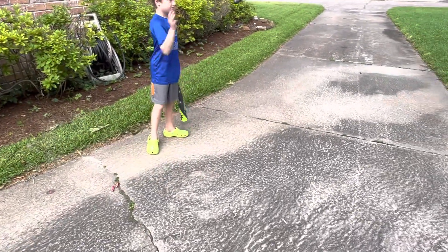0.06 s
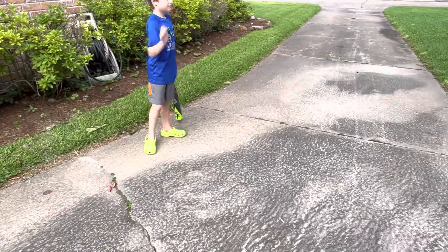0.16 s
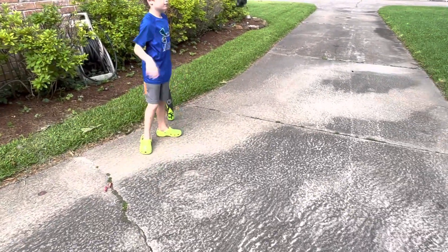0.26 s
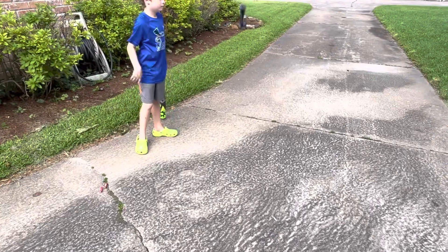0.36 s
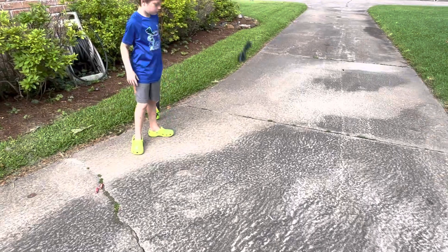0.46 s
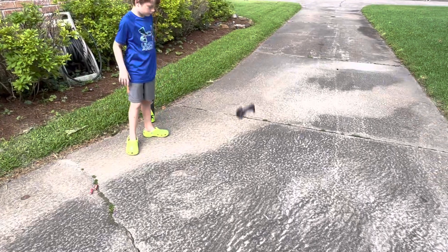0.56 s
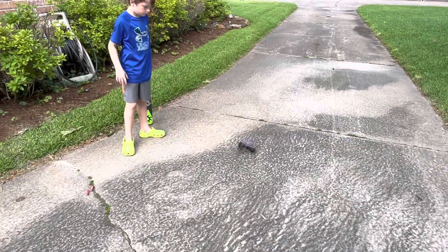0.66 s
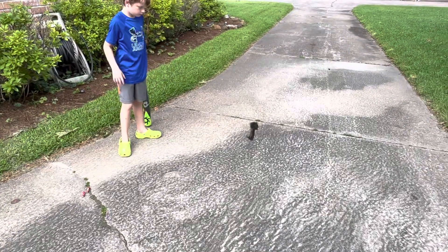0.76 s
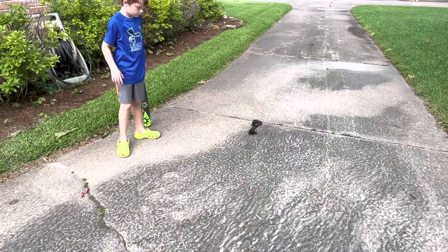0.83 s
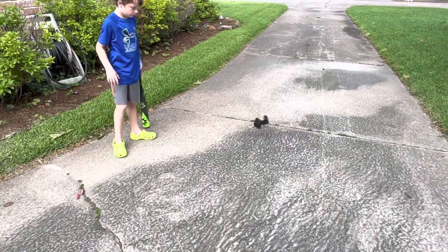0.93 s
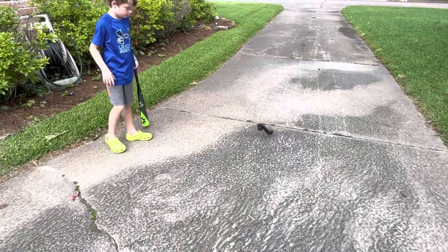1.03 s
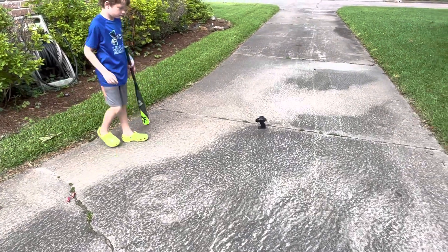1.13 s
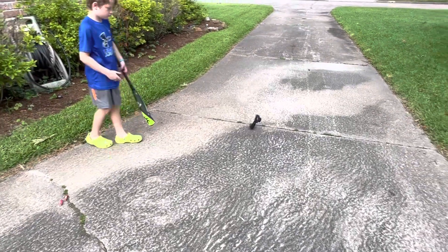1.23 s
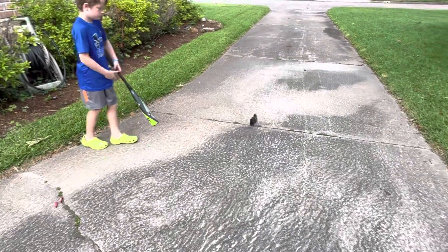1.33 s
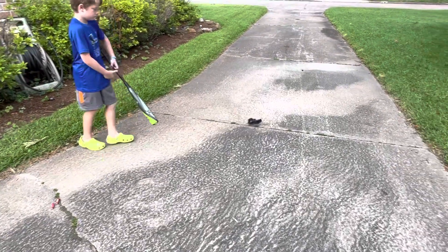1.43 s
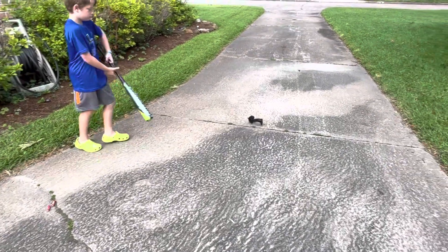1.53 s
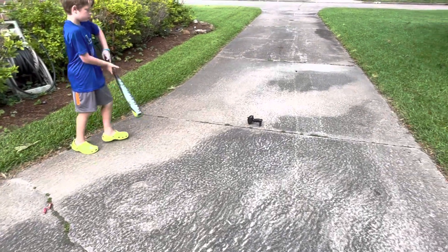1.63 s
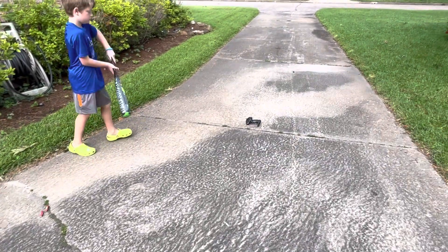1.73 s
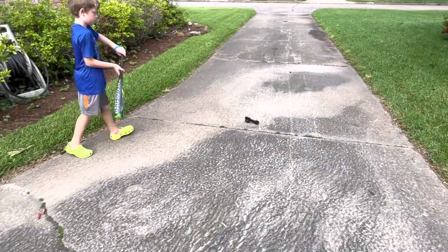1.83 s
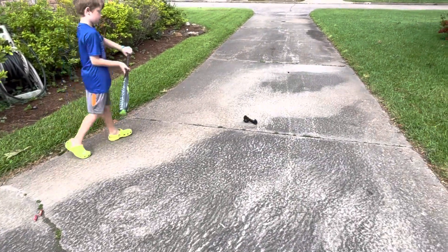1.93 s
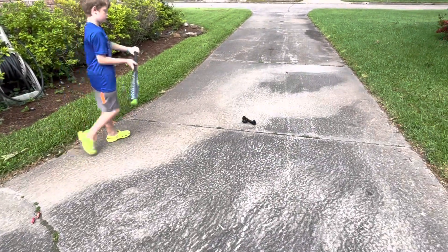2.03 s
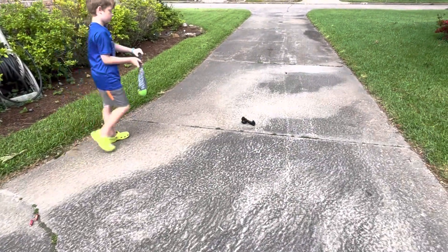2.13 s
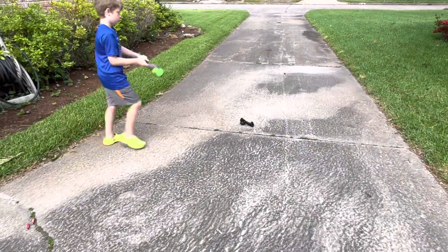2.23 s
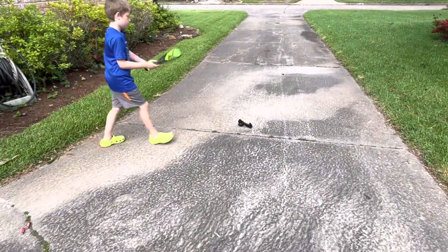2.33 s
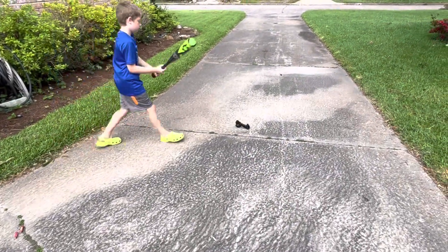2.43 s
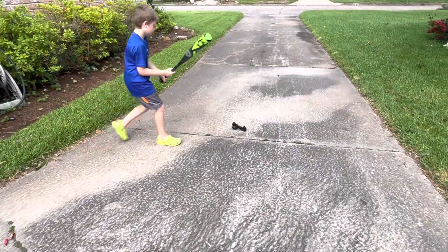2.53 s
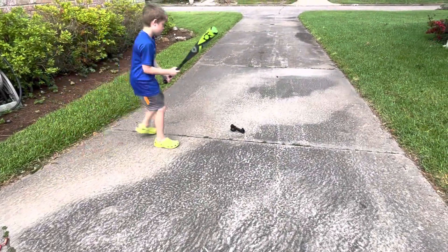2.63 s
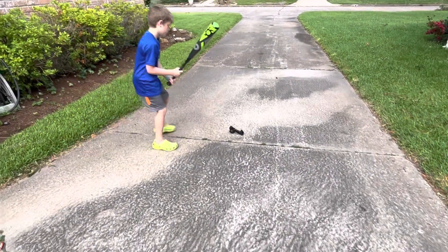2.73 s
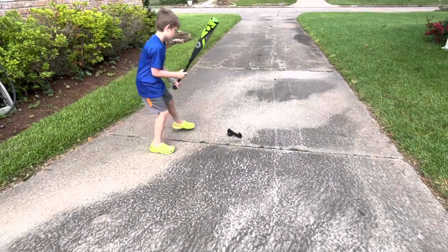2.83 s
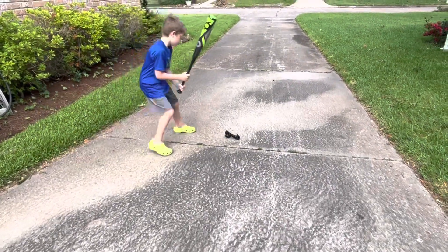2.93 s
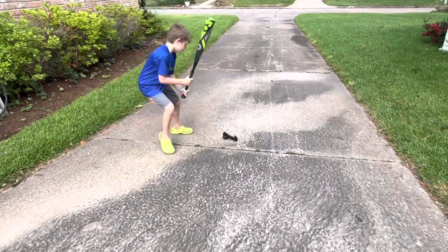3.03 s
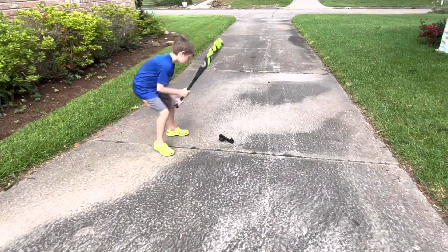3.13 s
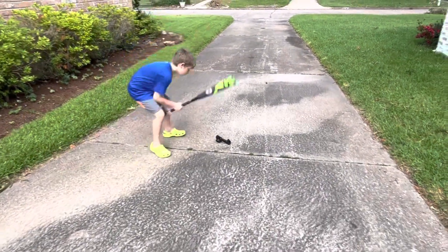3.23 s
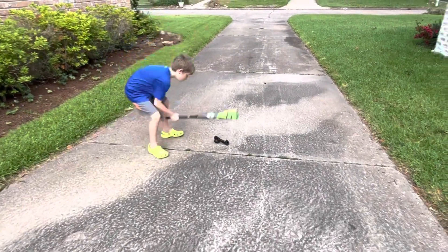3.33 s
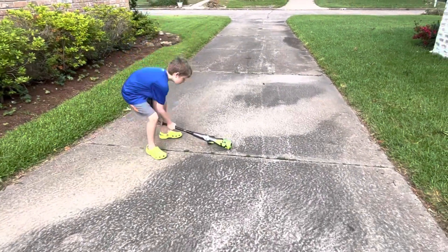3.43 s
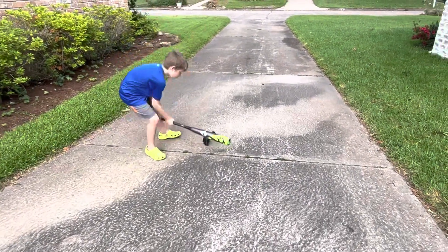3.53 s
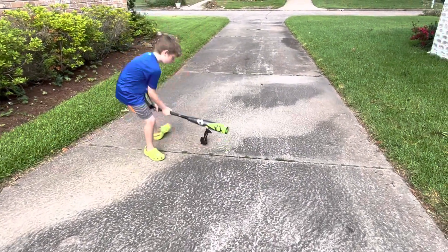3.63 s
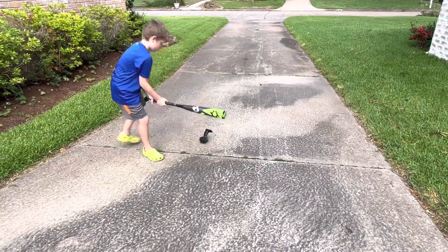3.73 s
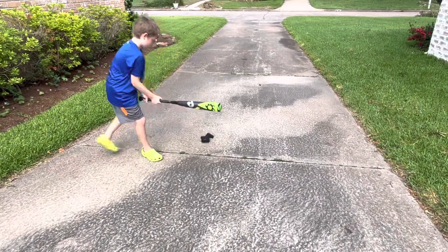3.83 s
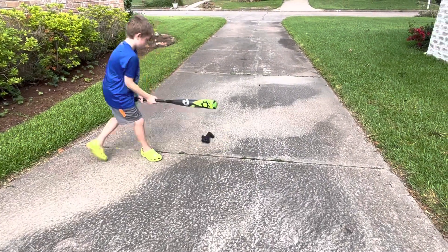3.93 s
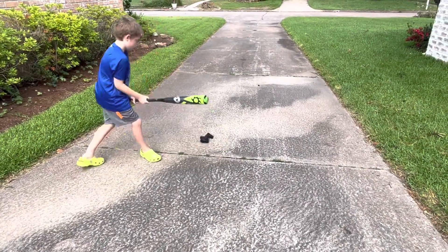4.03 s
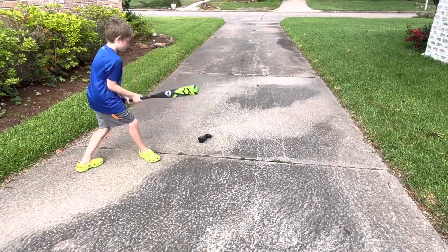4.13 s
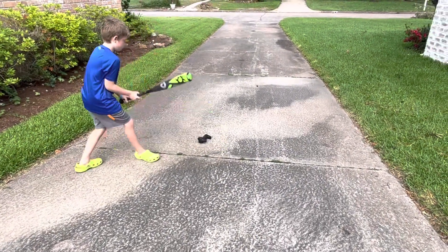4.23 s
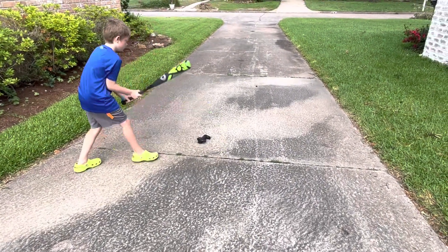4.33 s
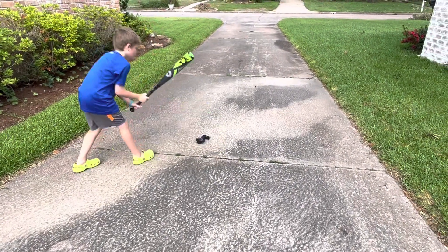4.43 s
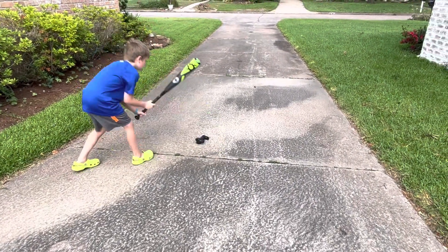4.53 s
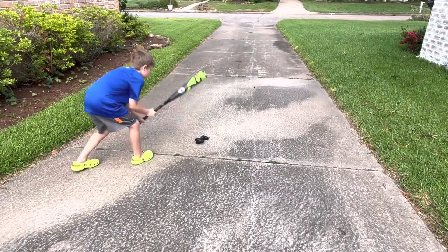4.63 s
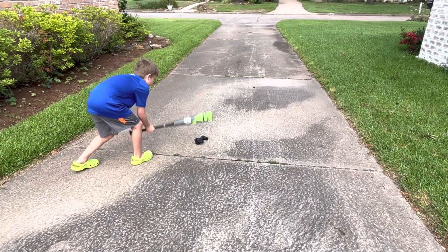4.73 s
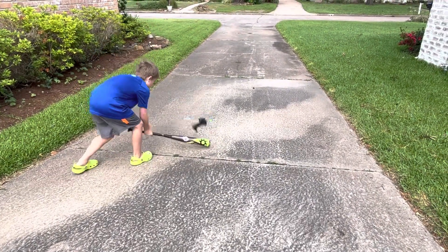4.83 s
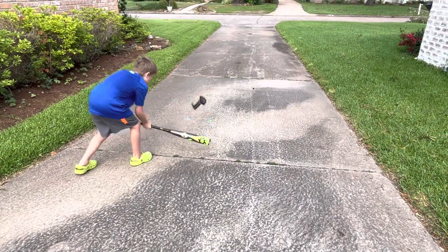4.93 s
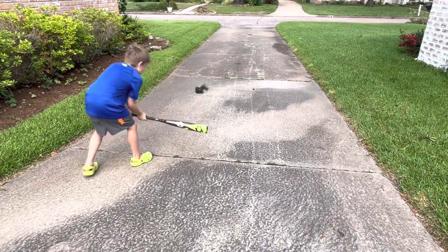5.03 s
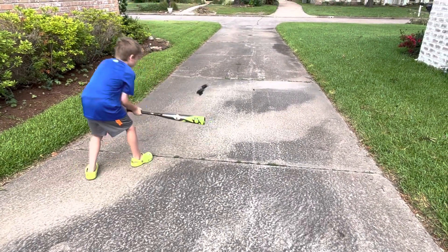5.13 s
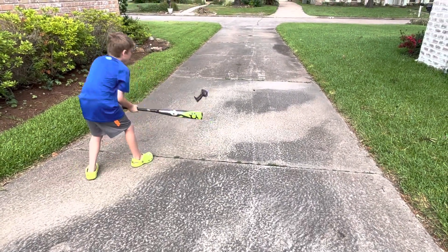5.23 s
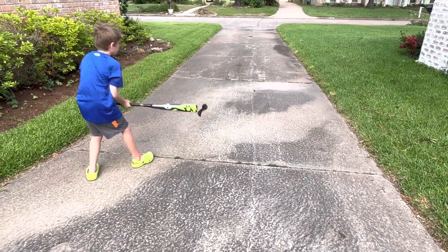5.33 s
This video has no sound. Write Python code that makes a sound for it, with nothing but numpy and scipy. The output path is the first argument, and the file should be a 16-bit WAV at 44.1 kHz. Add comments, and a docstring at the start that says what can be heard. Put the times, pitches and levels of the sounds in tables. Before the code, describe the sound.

On an outdoor driveway, a small hollow plastic object lands with a sharp clack, bounces and tumbles to rest. Shoes scuff softly on grit. A metal bat then smacks it with a hard crack and hollow ring, and the piece clatters down; more scuffing, then a second ringing crack. Faint birds, low rumble and short wall echoes; close handheld stereo microphone.

```python
"""Over low rumble, soft hiss (both coloured noise) and faint birds (gliding tones), a hollow plastic object
lands on a concrete driveway and tumbles to rest: noise bursts with short ringing modes.
Steps then scuff and grind grit (banded noise, bright ticks). Twice a metal bat swishes and cracks into the
plastic, ringing in four decaying modes; the object clatters down after the first blow and knocks after the second.
House walls and yard answer with single echoes, a patchy noise tail and thin late slaps."""
import sys
import numpy as np
from scipy import signal
from scipy.fft import rfft, irfft
from scipy.io import wavfile
from scipy.ndimage import uniform_filter1d

SR = 44100
rng = np.random.default_rng(int(sys.argv[2]) if len(sys.argv) > 2 else 0)


def dump(signal):
    """Clip the signal to [-1, 1] and save it as 16-bit WAV at the path in sys.argv[1]."""
    limited = np.clip(np.atleast_2d(signal).T, -1, 1)
    pcm = np.round(limited * 32767).astype(np.int16)
    wavfile.write(sys.argv[1], SR, pcm)


N = 236684
HZ = np.fft.rfftfreq(N, 1 / SR)

# distant low rumble: f/Hz, relative density/dB per Hz
RUMBLE = [(20, -33.5), (35, -23), (58, -2), (95, -3.5), (140, -4.5), (200, -16.5), (400, -42),
          (1000, -79.5)]
# loudness of the rumble before its dips: t/s, level/dB
RUMBLE_LEVEL = [(0, -45), (1.5, -42.5), (3.2, -42.5), (4.2, -43.5), (4.6, -46.5), (5.37, -42)]
# soft neighbourhood hiss: f/Hz, relative density/dB per Hz
AIR = [(20, -30.5), (100, -6.5), (180, -2), (300, -5), (520, -10.5), (880, -5.5), (1700, -19.5),
       (2800, -30), (4200, -42), (6200, -41.5), (8000, -56), (15000, -58)]
# likeness of rumble and hiss in the two channels: f/Hz, correlation/-1 to 1
AIR_SAME = [(60, 0.97), (180, 0.93), (400, 0.55), (750, .15), (1500, 0), (8000, 0.061)]
AIR_DB = -46  # rms of the hiss before its dips

# a distant bird's long whistles: start t/s, length/s, start f/Hz, end f/Hz, level/dB
WHISTLES = [(0.537, 0.36, 2980, 2830, -55), (2.379, 0.56, 2918, 2596, -58.5),
            (3.953, 0.34, 3000, 2710, -57)]
# a small bird's chips: start t/s, length/s, start f/Hz, end f/Hz, level/dB
CHIPS = [(.058, .02, 5900, 6200, -68), (.145, .016, 5000, 5120, -71), (.175, .022, 6200, 5000, -68),
         (.376, .02, 6550, 6150, -66), (.463, .02, 6350, 5900, -68)]

# single echoes off ground and walls, before the yard colour: delay/s, level/dB
WALLS = [(0.0115, -7.5), (.0345, -15.5), (.0445, -19.5), (0.093, -22)]
# colour of all the echoes: f/Hz, level/dB
YARD = [(200, -3.5), (700, 1.5), (2000, -1), (5000, 3.5), (8000, -3), (14000, -10)]
# decay of the long tail: f/Hz, t60/s
YARD_DECAY = [(300, 0.38), (800, 0.85), (2000, 1), (5000, 1), (9000, 0.9), (14000, 0.82)]
# thin late slaps off a far house front: loudest t/s, spread (Gaussian sigma)/s, level/dB, centre f/Hz, width/octaves
SLAPS = [(.918, 0.0029, -32, 4820, 0.09), (3.63, 0.014, -40.5, 4800, 0.13),
         (5.009, 0.0061, -40, 4700, 0.11)]

# soles scuffing and stamping, plastic sliding: loudest t/s, spread/s, level/dB, centre f/Hz, width/octaves
SCUFFS = [(1.92, .008, -49, 1960, 0.69), (2.392, 0.14, -67.5, 4900, 0.89), (2.92, 0.062, -60.5, 2400, 1.35),
          (3.231, 0.0016, -35.5, 1300, .44), (3.244, 0.013, -41.5, 1210, 0.78),
          (3.2513, 0.0005, -22.5, 1130, 0.56), (3.625, 0.019, -44, 900, 0.53),
          (3.68, 0.11, -46.5, 2560, 0.96), (3.9, 0.016, -41, 1000, 0.47), (4.124, .006, -45, 1450, 0.74)]
# barrel meeting the concrete on the second blow: loudest t/s, spread/s, level/dB, centre f/Hz, width/octaves
THUDS = [(4.792, .0072, -31.5, 300, .7)]
# swish of each swing: loudest t/s, spread/s, level/dB, centre f/Hz, width/octaves
SWISHES = [(3.218, .07, -67.5, 6500, 0.93), (4.65, 0.052, -58, 4400, 0.52)]
# grit under shoes and small taps: t/s, relative level/dB
TICKS = [(1.8242, -30.5), (2.025, -42.5), (2.1343, -42), (2.3438, -37), (2.384, -38), (2.807, -48),
         (2.9393, -29.5), (3.0664, -40), (4.2322, -29), (4.337, -39)]

# blows of the bat: t/s, ring level/dB, tilt of the modes/dB per octave, time to the barrel's quiet side/s,
# change of the ring by then/dB, depth of the background dip/dB, time to the bottom of that dip/s
BLOWS = [(3.387, -13, -3, .19, -1, 12, 0.1), (4.775, -12.5, -7, .245, -5.5, 5, 0.37)]
# modes of the metal barrel: f/Hz, relative level/dB, t60/s
BARREL = [(955, -18, 0.04), (1741, -4.5, 0.89), (2490, 2.5, 0.2), (4310, -2.5, .22)]
# pings of the barrel skipping after a blow: t/s, level/dB, f/Hz, decay time constant/s
PINGS = [(3.443, -26, 4410, 0.0045), (4.822, -17, 4420, 0.0041)]
# turning speeds up as this power of time; depth/dB of the dip on the quiet side; power that narrows the dip
TURN_POWER, QUIET_SIDE_DB, DIP_NARROWNESS = 1.9, -17, 29

# knocks on the plastic: t/s, relative level/dB, hardness/dB, rattle length/s, side that is struck
KNOCKS = [(0.6808, -25.5, 5.5, 0.0058, "flat"), (0.693, -19.5, -2, 0.015, "end"),
          (1.0524, -23.5, -1, 0.0063, "rim"), (1.28, -26, -3.5, 0.0067, "flat"),
          (1.415, -32.5, -1.5, 0.0073, "flat"), (1.488, -27.5, -3, 0.0062, "flat"),
          (1.602, -30, -20, 0.0092, "end"), (1.7341, -38, -0.5, 0.011, "flat"),
          (1.7698, -31.5, -9, 0.033, "end"), (3.3848, -22.5, 2.5, .008, "crushed"),
          (3.397, -22, 0.5, 0.011, "split"), (3.406, -28.5, 8, 0.0089, "pinned"),
          (3.8488, -26.5, -2.5, 0.0084, "split"), (4.0755, -43, -8.5, 0.017, "end"),
          (4.111, -42.5, -11, 0.0088, "end"), (4.7754, -21.5, 3.5, 0.0045, "pinned"),
          (4.779, -23, 3.5, 0.0027, "crushed"), (4.792, -29, 4, 0.0064, "end")]
# ways to strike the plastic, by name: low f/Hz, middle f/Hz, high f/Hz, hollow body level/dB
SIDES = {"flat": (674.5, 1231.5, 3260, -1), "end": (1201, 1480.5, 3596, -16),
         "rim": (618.5, 2348, 3700, -4.5), "pinned": (891.5, 1326, 3466, -6.5),
         "crushed": (935.5, 2793.5, 3399, -9), "split": (810, 1702.5, 3890, -7.5)}
# ringing of those three notes ahead of the band balance: relative level/dB, t60/s
NOTES = [(-7, .026), (-9, .016), (-11, .012)]
# shell modes, detuned at every knock: nominal f/Hz, relative level/dB, t60/s
SHELL = [(693, -12, 0.027), (850, 3.5, 0.013), (915, 0.5, 0.011), (1154, 0.5, 0.016), (1493, 5.5, 0.025),
         (2108, 0, 0.022), (2433, 1, 0.034), (2744, -4.5, 0.038), (3355, -13.5, 0.0088),
         (4095, -11.5, 0.034), (5436, 0.5, 0.018), (6920, -1.5, 0.02)]
# edges of the body, clack, crack and snap bands: f/Hz
KNOCK_BANDS = [400, 1000, 2800, 6500, 15000]
# likeness of knocks, ticks and swells in the two channels, clipped to -1 to 1 in use: f/Hz, correlation
KNOCK_SAME = [(400, 0.5), (750, 1.2), (5000, -0.2), (7000, -0.25), (12000, -0.08)]
# crack and snap against the clack at zero hardness/dB; growth of the snap per dB of hardness
CRACK_DB, SNAP_DB, SNAP_GROWTH = -0.5, -6, 1.31
# contact rise time constant/s; random spread of the notes/share; lead of the notes on the left/s
CONTACT_S, NOTE_SPREAD, PORT_LAG = 0.00036, .02, .00004
LEAD = 64  # samples of room ahead of each knock

# stereo balance of direct knocks, ticks, scuffs, thuds and swishes: f/Hz, left minus right level/dB
BALANCE = [(200, 0), (600, 4), (1200, 7), (2200, -0.5), (4000, -8.5), (6000, -0.5), (12000, -1)]
# treble colour of the whole sound: f/Hz, level/dB
TREBLE = [(4000, 0), (6500, .5), (8200, 0.5), (10300, -3), (12800, 4), (14300, -4.5), (15800, -3)]
EDGE_HZ = 15300  # top of the band


def amp(db):
    """Decibels to gain."""
    return 10 ** (np.asarray(db) / 20)


def unit(x):
    """Scales to an average energy of one per channel."""
    return x / np.sqrt(np.mean(np.sum(x ** 2, -1)) + 1e-20)


def read(points, hz):
    """Reads a curve on a log-frequency axis."""
    f, value = np.transpose(points)
    return np.interp(np.log(hz + 1), np.log(f + 1), value)


def tint(x, curve):
    """Colours a sound with a curve in dB."""
    size = x.shape[-1]
    return irfft(rfft(x) * amp(read(curve, np.fft.rfftfreq(size, 1 / SR))), size)


def add(mix, s, sound):
    """Adds a sound into the stereo mix at time s."""
    part = mix[:, max(round(s * SR), 0):][:, :sound.shape[-1]]
    part += sound[..., :part.shape[-1]]


def level(curve):
    """Gain at every sample from rows of t/s, level/dB."""
    return amp(np.interp(np.arange(N) / SR, *np.transpose(curve)))


def noise_pair(likeness, size):
    """White noise for two channels, correlated by a share that depends on frequency."""
    same = np.clip(read(likeness, np.fft.rfftfreq(size, 1 / SR)), -1, 1)
    a, b = rfft(rng.standard_normal((2, size)))
    return irfft([a, same * a + np.sqrt(1 - same ** 2) * b], size)


def wash(spectrum):
    """Steady noise of a given colour, at an rms of one."""
    return unit(tint(noise_pair(AIR_SAME, N), spectrum)) * np.sqrt(N)


def dips():
    """How far the background sinks after each blow before it comes back (dB at every sample)."""
    sunk_db = np.zeros(N)
    for s, *_, depth_db, bottom_s in BLOWS:
        age = np.maximum(np.arange(N) / SR - s, 0) / bottom_s
        sunk_db += depth_db * (age * np.exp(1 - age)) ** 2
    return sunk_db


def air():
    """Low rumble and soft neighbourhood hiss as coloured noise; both sink for a moment after each blow."""
    sunk_db = dips()
    rumble = wash(RUMBLE) * level(RUMBLE_LEVEL) * amp(-sunk_db)
    hiss = wash(AIR) * amp(AIR_DB - sunk_db)
    return rumble + hiss


def birds(waver=0.01):
    """Faint gliding sines, their pitch wavering slightly, each swelling and fading."""
    out = np.zeros((2, N))
    for s, length, start_hz, end_hz, db in WHISTLES + CHIPS:
        t = np.arange(0, length, 1 / SR)
        wander = np.interp(t, np.linspace(0, .5, 50), rng.standard_normal(50))
        hz = np.linspace(start_hz, end_hz, len(t)) * (1 + waver * wander)
        tone = np.sin(2 * np.pi * np.cumsum(hz) / SR)
        add(out, s, amp(db) * tone * np.sin(np.pi * t / length))
    return out


def yard(x, near_db=-8, near_t60=0.35, far_db=-13, patchy_db=5.0):
    """Wall echoes, quick scatter from hedge and house and a long uneven tail, convolved with the sound."""
    t = np.arange(SR) / SR
    far_onset = np.clip((t - .01) / 0.0047, 0, 1)
    scatter = rng.standard_normal((2, SR)) * (rng.random((2, SR)) < .12) * far_onset
    hz, when, z = signal.stft(scatter, SR, nperseg=256)
    # scattered things outdoors send the sound back in clumps of frequency and time
    clumps = uniform_filter1d(rng.standard_normal(z.shape[1:]), size=12, axis=0)
    clumps = uniform_filter1d(clumps, size=3, axis=1)
    z = z * amp(patchy_db * clumps / clumps.std())
    decay = amp(-60 * when / read(YARD_DECAY, hz)[:, None])
    far = signal.istft(z * decay, SR, nperseg=256)[1][:, :SR]
    near_onset = np.clip((t - .012) / 0.0063, 0, 1)
    near = rng.standard_normal((2, SR)) * (rng.random((2, SR)) < .02) * near_onset * amp(-60 * t / near_t60)
    echo = amp(far_db) * unit(far) + amp(near_db) * unit(near)
    for delay, db in WALLS:
        slap = rng.standard_normal((2, SR)) * np.exp(-t / .0003)
        add(echo, delay, amp(db) * unit(slap))
    return signal.fftconvolve(x, tint(echo, YARD), axes=1)[:, :N]


def swells(rows, grain_db=3, size=32768):
    """Scuffs, thuds, swishes and slaps: short grainy swells of noise, each in its own band."""
    out = np.zeros((2, N))
    t, hz = (np.arange(size) - size // 2) / SR, np.fft.rfftfreq(size, 1 / SR)
    for s, spread, db, centre_hz, octaves in rows:
        swell = np.exp(-.5 * (t / spread) ** 2)
        grains = amp(grain_db * np.repeat(rng.standard_normal(size // 64), 64))
        band = np.exp(-.5 * (np.log2((hz + 1) / centre_hz) / octaves) ** 2)
        rub = irfft(rfft(noise_pair(KNOCK_SAME, size) * swell * grains) * band)
        add(out, s + t[0], amp(db) * np.linalg.norm(swell) * unit(rub))
    return out


def grit(level_db=9, size=1024):
    """Sand on concrete: tiny bright ticks of band-passed noise that die in milliseconds."""
    out, t = np.zeros((2, N)), np.arange(size) / SR
    crunch = np.exp(-t / .0025)
    bright = signal.butter(1, [900, 6000], "band", fs=SR)
    for s, db in TICKS:
        tick = signal.lfilter(*bright, noise_pair(KNOCK_SAME, size) * crunch)
        add(out, s, amp(db + level_db) * unit(tick))
    return out


def pings(rows):
    """The skipping barrel's brief bright blips, each a dying sine."""
    out, t = np.zeros((2, N)), np.arange(2048) / SR
    for s, db, hz, decay in rows:
        phase = rng.random((2, 1)) / 2  # in cycles
        tone = np.sin(2 * np.pi * (hz * t + phase))
        add(out, s, amp(db) * tone * np.exp(-t / decay) * (1 - np.exp(-t / 0.00035)))
    return out


def turning(t, quiet_s, turned_db):
    """The ring dips as the rebounding barrel turns its quiet side, and comes back at another level."""
    quarters = (t / quiet_s) ** TURN_POWER
    dip_db = QUIET_SIDE_DB * abs(np.sin(np.pi / 2 * quarters)) ** DIP_NARROWNESS
    return amp(dip_db + turned_db * np.clip(2 * quarters - 1, 0, 1))


def bat(port_lag=0.00015, rise_s=0.0024):
    """The barrel's modes ring and decay after each blow, dip as the bat turns, and ping as it skips."""
    out, t = np.zeros((2, N)), np.arange(SR) / SR
    heard = t + np.array([[port_lag], [0]])  # the left leads
    for s, level_db, tilt_db, quiet_s, turned_db, *_ in BLOWS:
        ring = 0
        for f, db, t60 in BARREL:
            mode_db = db + tilt_db * np.log2(f / BARREL[1][0]) - 60 * t / t60
            ring = ring + amp(mode_db) * np.sin(2 * np.pi * f * heard)
        rise = 1 - np.exp(-t / rise_s)
        add(out, s, amp(level_db) * ring * rise * turning(t, quiet_s, turned_db))
    return out + pings(PINGS)


def knock(band_db, rattle, notes_hz, shell_db=-6, edge_db=-9, size=4096):
    """A sharp contact and a few ms of rattling joints set the hollow shell ringing."""
    t, hz = np.arange(size) / SR, np.fft.rfftfreq(size, 1 / SR)
    crack = unit(noise_pair(KNOCK_SAME, size) * np.exp(-(t / max(rattle, .0005)) ** 2))
    edge = unit(noise_pair(KNOCK_SAME, size) * np.exp(-t / 0.0002))
    # every knock excites and stiffens the modes in its own way
    shell = 0
    for f, db, t60 in SHELL:
        mode_hz = f * (1 + 0.047 * rng.standard_normal())
        phase = rng.random() + 0.27 * rng.standard_normal((2, 1))  # in cycles
        shell = shell + amp(db - 60 * t / t60) * np.sin(2 * np.pi * (mode_hz * t + phase))
    # three notes stand out
    heard, notes = t + np.array([[PORT_LAG], [0]]), 0
    for f, (db, t60) in zip(notes_hz, NOTES):
        notes = notes + amp(db) * unit(np.sin(2 * np.pi * f * heard) * amp(-60 * t / t60))
    struck = crack + amp(edge_db) * edge + amp(shell_db) * unit(shell) + notes
    z = rfft(np.roll(struck * (1 - np.exp(-t / CONTACT_S)), LEAD, -1))
    # set the energy of four broad bands
    lo, hi = np.array(KNOCK_BANDS[:-1]), np.array(KNOCK_BANDS[1:])
    own_db = []
    for a, b in zip(lo, hi):
        power = np.mean(abs(z[:, (hz > a) & (hz < b)]) ** 2)
        own_db.append(10 * np.log10(power * 2 * (b - a) / SR))
    colour = read(np.c_[np.sqrt(lo * hi), np.subtract(band_db, own_db)], hz)
    small_body = signal.butter(2, 380, "high", fs=SR)  # a small thing radiates little bass
    return signal.lfilter(*small_body, irfft(z * amp(colour)))


def plastic(level_db=28):
    """All the landings, bounces and cracks of the plastic object; harder contacts are brighter."""
    out = np.zeros((2, N))
    for s, db, hardness, rattle, side in KNOCKS:
        *notes_hz, body_db = SIDES[side]
        snap_db = SNAP_DB + SNAP_GROWTH * hardness
        band_db = db + np.array([body_db, 0, CRACK_DB + hardness, snap_db])
        varied_hz = notes_hz * (1 + NOTE_SPREAD * rng.standard_normal(len(notes_hz)))
        add(out, s - LEAD / SR, knock(band_db, rattle, varied_hz))
    return amp(level_db) * out


def scene(bird_wet_db=0, scuff_wet_db=-7, ring_wet_db=-11):
    """Everything on the driveway, with its echoes and the background."""
    hits = plastic() + grit()
    rubs = swells(SCUFFS + THUDS + SWISHES)
    ring, song = bat(), birds()
    balance_db = np.array([[.5], [-.5]]) * read(BALANCE, HZ)
    direct = irfft(rfft(hits + rubs) * amp(balance_db), N)
    sent = hits + amp(scuff_wet_db) * rubs + amp(ring_wet_db) * ring + amp(bird_wet_db) * song
    return direct + ring + song + yard(sent) + swells(SLAPS) + air()


def record(dry):
    """The treble is coloured, the loudest peaks are rounded off; then the band limit."""
    heard = tint(dry, TREBLE)
    rounded = heard / (1 + (heard / .95) ** 6) ** (1 / 6)
    band_limit = signal.firwin(255, EDGE_HZ, window=("kaiser", 9), fs=SR)
    return signal.oaconvolve(rounded, band_limit[None], "same")


dry = scene()
out = record(dry)
dump(out)
```